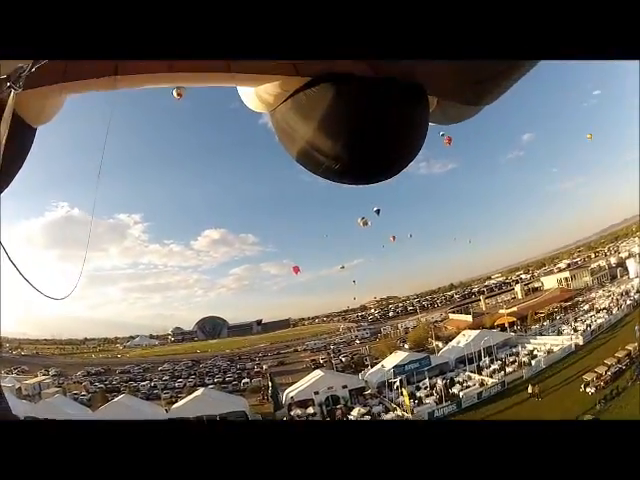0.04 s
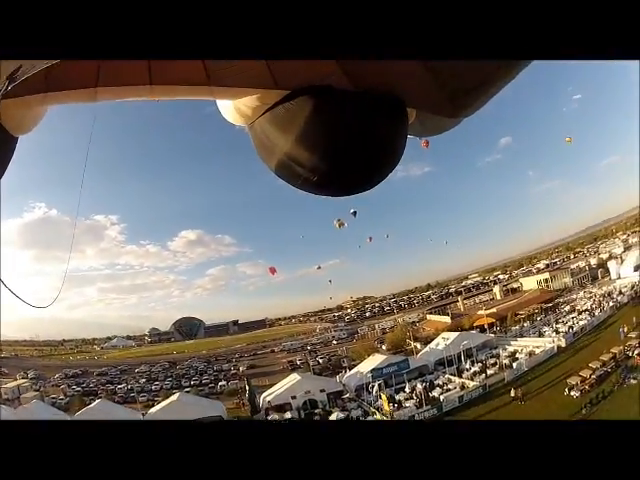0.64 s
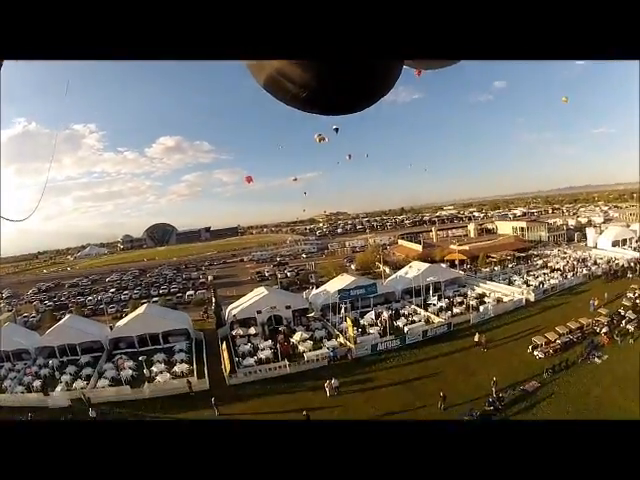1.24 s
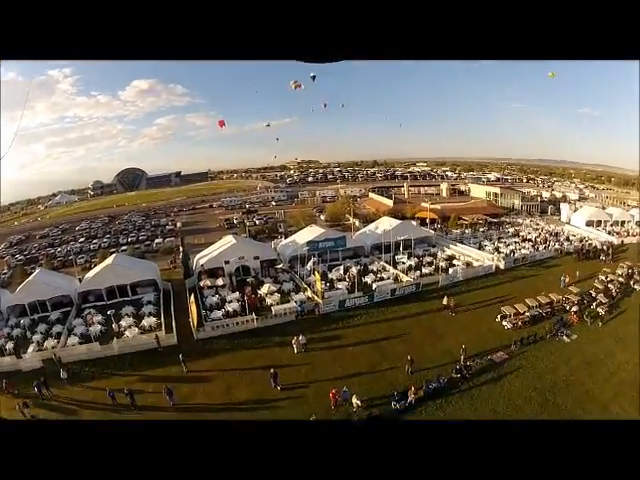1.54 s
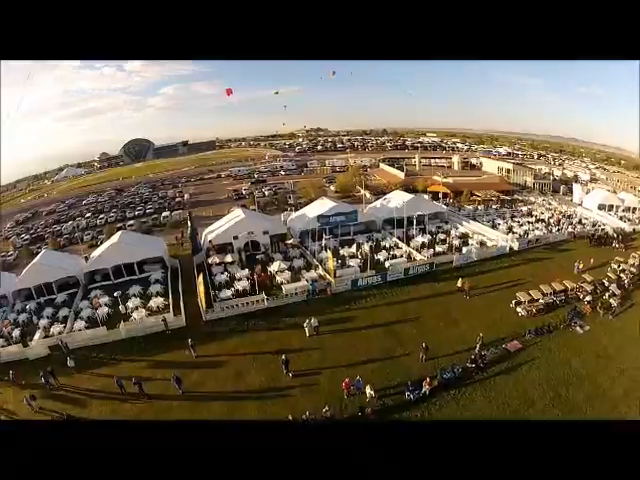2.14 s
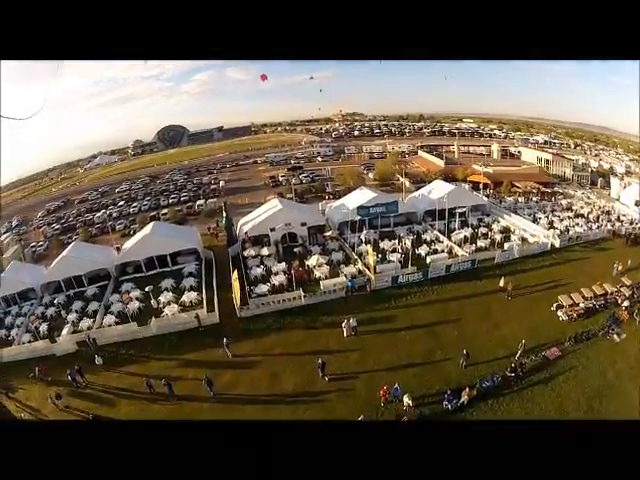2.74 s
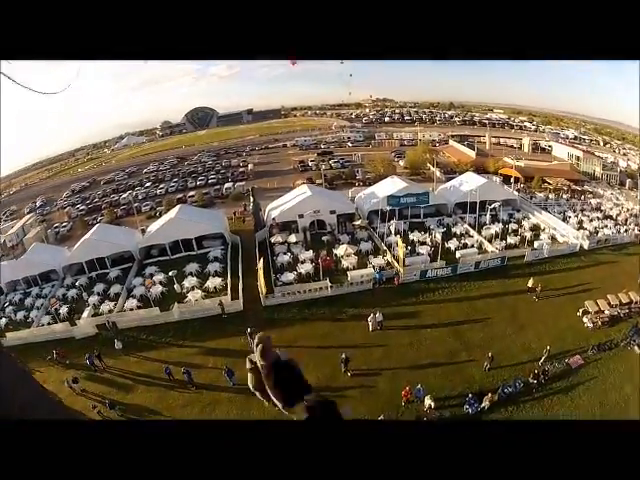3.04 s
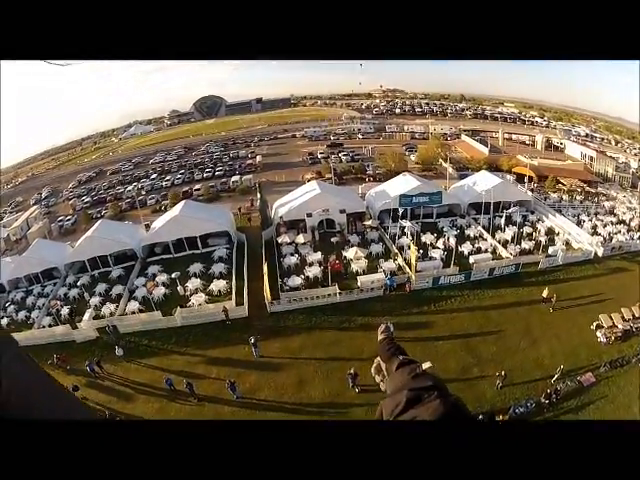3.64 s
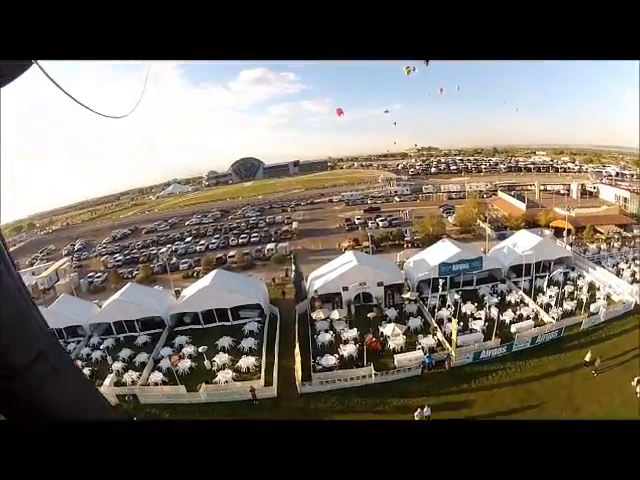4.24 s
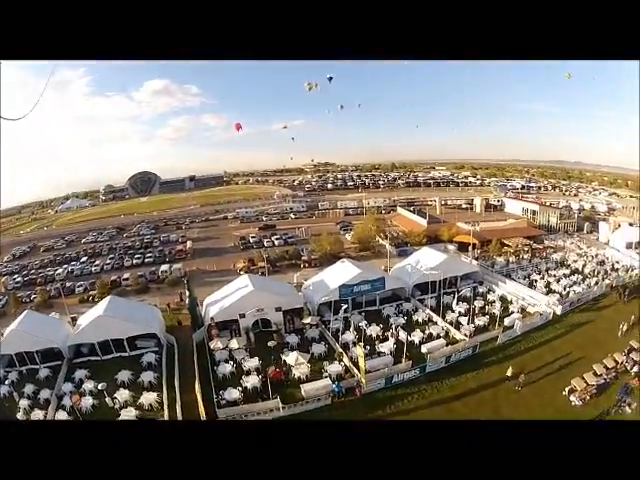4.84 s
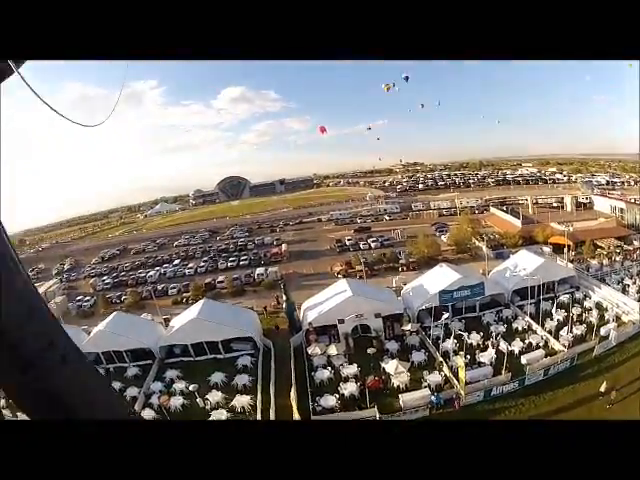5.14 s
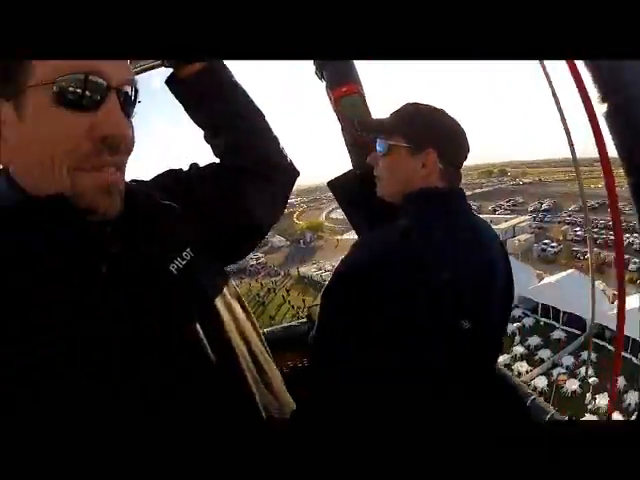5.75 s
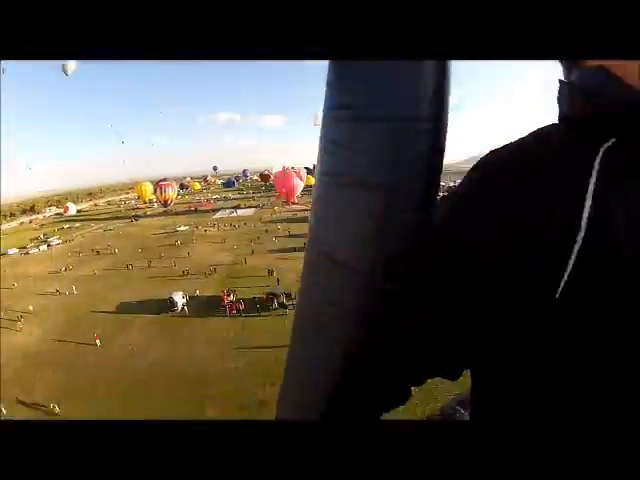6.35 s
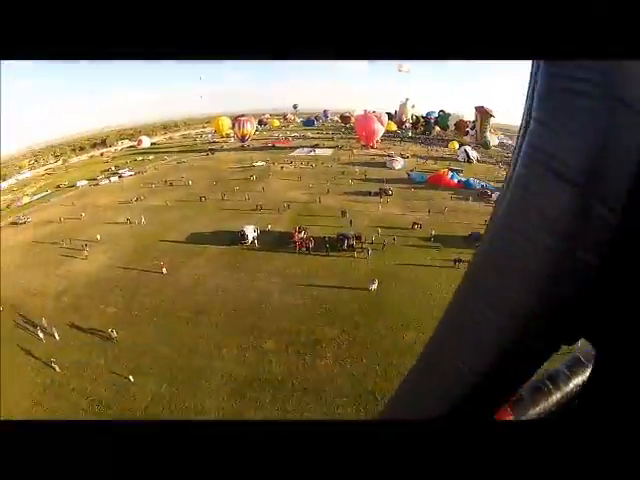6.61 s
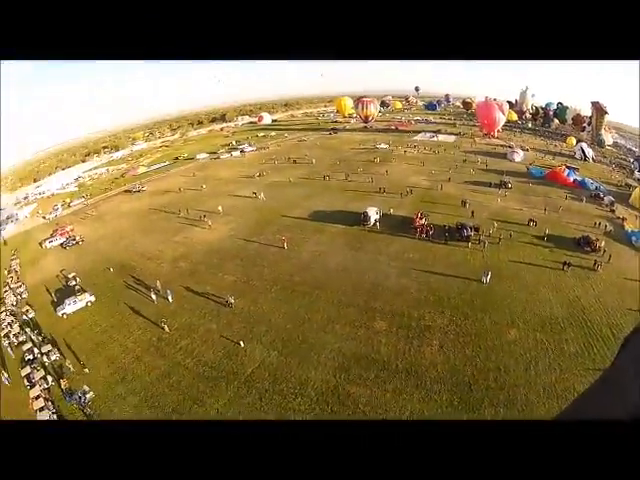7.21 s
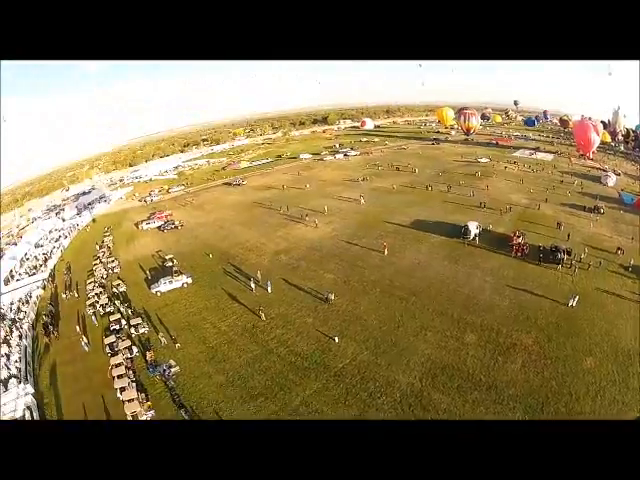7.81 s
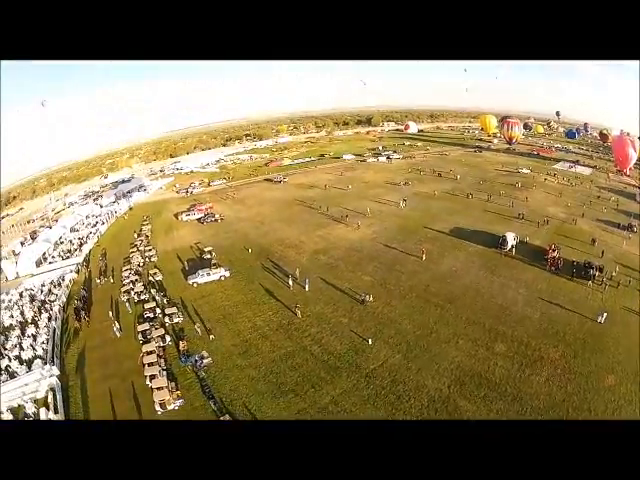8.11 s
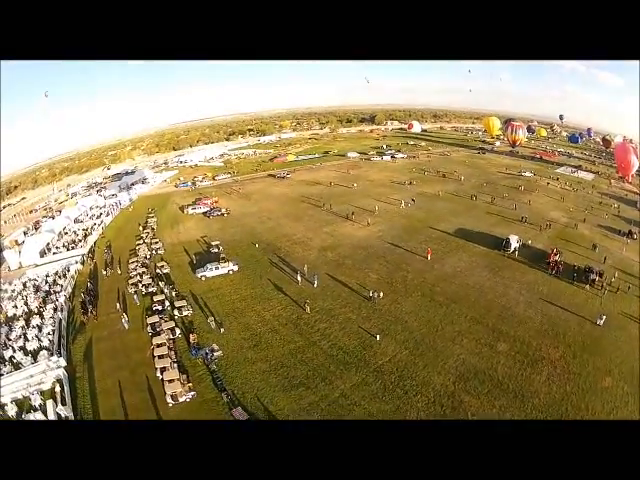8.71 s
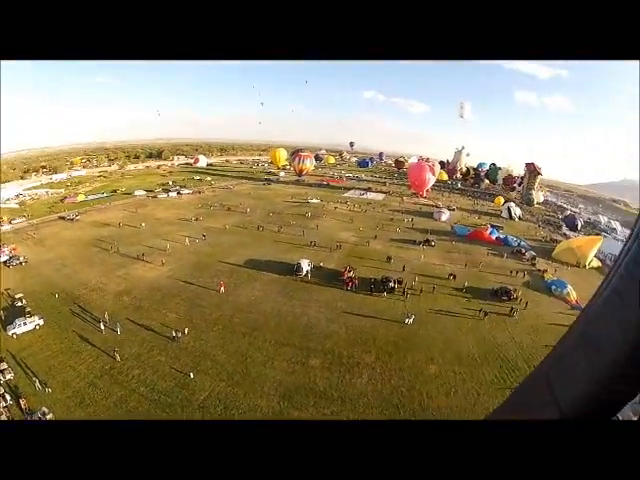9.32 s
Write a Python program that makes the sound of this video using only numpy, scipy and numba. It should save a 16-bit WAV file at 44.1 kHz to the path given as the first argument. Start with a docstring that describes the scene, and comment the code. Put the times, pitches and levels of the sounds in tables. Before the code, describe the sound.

Two long, loud blasts of a balloon burner, with hissing gas and small pops, split by a pause filled with faint distant rumbling.

```python
"""A hot-air balloon's propane burner fires two long blasts just above the basket. Its swirling flame
roars, pockets of gas pop as they catch fire, and the gas jets hiss. Between the blasts one hears other
burners rumbling far off, a faint whistle and a clink of metal; then the flame relights with a thump.
A small mono camera turns itself down after each peak and holds its samples at a low rate, which adds
a thin sizzle on top."""
import sys
import numpy as np
from scipy import signal
from scipy.fft import rfft, irfft
from scipy.io import wavfile
from scipy.ndimage import uniform_filter1d
from numba import njit

SR = 44100
rng = np.random.default_rng(int(sys.argv[2]) if len(sys.argv) > 2 else 0)


def wav_record(signal):
    """Record a signal, one row per channel, as 16-bit PCM in the file named by sys.argv[1]."""
    frames = np.transpose(np.atleast_2d(signal))
    bounded = np.clip(frames, -1, 1)
    # unit amplitude maps onto the largest positive 16-bit level
    quanta = np.round(bounded * 32767).astype(np.int16)
    wavfile.write(sys.argv[1], SR, quanta)


N = 417627
TIME = np.arange(N) / SR
SHUT_S, RELIGHT_S = 4.124, 5.6  # the valve is half shut; the valve opens again
IN_VIEW_DB, HIDDEN_DB = -33, -37.5  # jet levels in the treble tables: burner in plain view, burner hidden

# A spectrum says how strong the low and the high parts of a noise are.
# Other burners across the launch field: (frequency [Hz], level [dB])
FAR_BURNER_SPECTRUM = [(20, -12), (60, -3), (120, 1), (300, -4.5), (730, -8.5), (850, -16), (885, -14.5),
                       (950, -24), (2300, -27), (3050, -30.5), (3600, -40), (4450, -34.5), (4830, -32),
                       (5900, -48)]
# A faint whistle, perhaps the pilot light: (pitch [Hz], level [dB])
WHISTLE_TONE = [(872.1, -56.5)]
# Gas pockets catching fire; the deepest is the relighting thump:
# (time [s], push level [dB], pitch [Hz], crack level [dB])
GAS_POPS = [(0.286, 5, 440, -16), (0.794, -1, 260, -17), (0.911, 0, 230, -16), (1.995, 0, 250, -18),
            (2.326, 7, 420, -22), (2.573, 1, 220, -15), (2.727, 7, 460, -24), (3.483, 7.5, 470, -24),
            (5.622, 3, 76, -30), (6.309, 0, 150, -24), (6.622, 1, 170, -20), (6.831, 6, 380, -7),
            (7.31, 0, 200, -17)]
# The short crack heard with each pop: (frequency [Hz], level [dB])
CRACK_SPECTRUM = [(800, 6.5), (1250, -4), (1700, -10), (2600, -14), (4500, -25)]
# The burner's metal can, ringing with a fresh flame inside: (frequency [Hz], level [dB])
FLARE_SPECTRUM = [(440, -2.5), (535, -1), (620, -10), (800, -11), (1060, -21.5), (1300, -45)]
# The hiss of the nozzles: (frequency [Hz], level [dB])
NOZZLE_SPECTRUM = [(3000, -29), (3450, -7), (3850, 0), (4200, 2), (4500, 0.5), (4800, 2.5), (5100, -2.5),
                   (5500, -7.5), (5950, -11)]
# The rush of the jets in plain view, shaped by the can: (frequency [Hz], level [dB])
OPEN_JET_SPECTRUM = [(700, -4), (1100, -1), (1230, -9), (1500, -1), (1780, -3.5), (2130, 2.5), (2480, -2),
                     (2680, -6), (2960, 0), (3200, -3), (3450, -10.5), (4200, -33)]
# The hollower rush that comes around the frame and people: (frequency [Hz], level [dB])
HIDDEN_JET_SPECTRUM = [(700, -3.5), (1100, -2.5), (1290, -6.5), (1650, -2), (2200, 1.5), (2450, -4.5),
                       (2660, -8), (2950, -0.5), (3150, -5), (3330, -13.5), (4200, -38)]
# The treble (high sounds) of each blast, as frame and people shield the turning microphone:
# (time [s], relative jet level [dB], relative nozzle level [dB])
FIRST_BLAST_TREBLE = [(0.05, -40, -40.5), (1.62, -35, -42.5), (1.76, -34.5, -40.5), (2.54, -33, -41),
                      (3.57, -37.5, -42.5), (3.82, -38.5, -45.5)]
SECOND_BLAST_TREBLE = [(5.66, -42.5, -41), (5.93, -44.5, -41.5), (7.11, -31.5, -33.5), (7.63, -33, -33),
                       (9.06, -30, -30.5), (9.4, -34, -36)]
# The swirling body of the flame: (frequency [Hz], level [dB])
FLAME_BODY_SPECTRUM = [(20, -27), (45, -12.5), (120, -4), (175, -4), (215, 0), (255, -4.5), (290, -3),
                       (350, -20.5)]
# The root of the flame at the burner coils: (frequency [Hz], level [dB])
FLAME_ROOT_SPECTRUM = [(255, -20.5), (305, -0.5), (345, -2.5), (400, -1), (440, -3), (510, 1.5), (620, -4),
                       (780, -11), (980, -28.5), (1350, -53.5)]


def undb(db):
    """Turn decibels into a number to multiply a sound by."""
    return 10 ** (np.asarray(db) / 20)


def wander(per_s):
    """A smooth random curve, roughly between -1 and 1, that heads for a new value per_s times a second."""
    width = max(int(SR / per_s), 2)
    steps = np.repeat(rng.standard_normal(N // width + 1), width)
    return 1.3 * uniform_filter1d(uniform_filter1d(steps, width), width)[:N]


def colour(sound, spectrum):
    """Shape a sound with a spectrum, fade what lies beyond its ends, and scale to an average power of 1."""
    hz, db = np.transpose(spectrum)
    freqs = np.maximum(np.arange(N // 2 + 1) * SR / N, 1)
    shape = undb(np.interp(np.log(freqs), np.log(hz), db))
    edges = np.minimum(freqs / hz[0], 1) ** 2 * np.minimum(hz[-1] / freqs, 1) ** 8
    shaped = irfft(rfft(sound) * shape * edges, N)
    return shaped / np.sqrt(np.mean(shaped ** 2))


def turbulence(spectrum, swirl_db, swirls_per_s):
    """Flowing gas makes noise in small swirls, each with its own strength."""
    return colour(rng.standard_normal(N) * undb(swirl_db * wander(swirls_per_s)), spectrum)


@njit
def follow_peaks(sound, start, rise, fall):
    """Track a sound's peaks: jump up fast, sink back slowly."""
    peaks, level = np.empty(len(sound)), start
    for i in range(len(sound)):
        level += (sound[i] - level) * (rise if sound[i] > level else fall)
        peaks[i] = level
    return peaks


def far_burners(level_db, swell_db):
    """Distant burners blend into a dull, nearly steady rumble."""
    rumble = turbulence(FAR_BURNER_SPECTRUM, swirl_db=0.45, swirls_per_s=44)
    return rumble * undb(level_db + swell_db * wander(2.82))


def whistle(waver_hz):
    """A thin, constant tone whose pitch wavers a little."""
    hz, db = WHISTLE_TONE[0]
    pitch = hz + waver_hz * wander(12)
    return np.sqrt(2) * undb(db) * np.sin(2 * np.pi * np.cumsum(pitch) / SR)


def clink(at_s, level_db, hz, rise_s, fade_s):
    """Metal fittings scrape once, faintly."""
    age = np.maximum(TIME - at_s + rise_s, 0)
    ring = colour(rng.standard_normal(N), [(hz / 2, -9), (hz, 0), (hz * 1.2, -9)])
    return undb(level_db) * ring * np.minimum(age / rise_s, 1) * np.exp(-age / fade_s)


def pops(cycles, crack_s):
    """Each gas pocket catches all at once: it pushes the air and sucks it back; a short crack sounds with each
    pop."""
    push, crack_level = np.zeros(N), np.zeros(N)
    for at_s, push_db, hz, crack_db in GAS_POPS:
        near = np.abs(TIME - at_s) < .05
        age = TIME[near] - at_s
        push[near] -= undb(push_db) * np.sin(2 * np.pi * hz * age) * np.exp(-(hz * age / cycles) ** 2)
        crack_level[near] += undb(crack_db) * np.exp(-np.abs(age) / crack_s)
    return push + crack_level * colour(rng.standard_normal(N), CRACK_SPECTRUM)


def flare(level_db, build_s, settle_s):
    """After relighting, the can rings until the flame stands clear of it."""
    age = np.maximum(TIME - RELIGHT_S, 0)
    swell = (1 - np.exp(-age / build_s)) * np.exp(-age / settle_s)
    return undb(level_db) * swell * turbulence(FLARE_SPECTRUM, swirl_db=1.5, swirls_per_s=62)


def nozzle_hiss(nozzle_db, boost_db):
    """Gas leaving the nozzles makes a high, even hiss."""
    return undb(nozzle_db + boost_db) * turbulence(NOZZLE_SPECTRUM, swirl_db=0.23, swirls_per_s=220)


def gas_jets(jet_db, boost_db):
    """The more the rushing jets are hidden from the microphone, the fainter and hollower they sound."""
    hidden = np.clip((jet_db - IN_VIEW_DB) / (HIDDEN_DB - IN_VIEW_DB), 0, 1)
    direct = turbulence(OPEN_JET_SPECTRUM, swirl_db=1.0, swirls_per_s=780)
    hollow = colour(rng.standard_normal(N), HIDDEN_JET_SPECTRUM)
    return undb(jet_db + boost_db) * (np.sqrt(1 - hidden) * direct + np.sqrt(hidden) * hollow)


def flame_body(jet_db, level_db, relit_boost_db, build_s):
    """The flame's swirling body rumbles; once relit it burns harder, which takes a moment to build."""
    growth = 1 - np.exp(-np.maximum(TIME - RELIGHT_S, 0) / build_s)
    shielding_db = 0.16 * (jet_db - IN_VIEW_DB)  # low sound bends around obstacles, so it loses little
    billow_db = 0.2 * wander(4.4)
    rumble = turbulence(FLAME_BODY_SPECTRUM, swirl_db=1.5, swirls_per_s=70)
    return undb(level_db + relit_boost_db * growth + shielding_db + billow_db) * rumble


def flame_root(level_db, relit_boost_db):
    """The flame roars at the burner coils, a touch louder once relit."""
    roar = turbulence(FLAME_ROOT_SPECTRUM, swirl_db=1.55, swirls_per_s=140)
    return undb(level_db + relit_boost_db * (TIME > RELIGHT_S)) * roar


def valve_flow(close_s, open_s):
    """How much gas gets through, from 0 to 1: the valve eases shut and later snaps open."""
    closing = .5 - .5 * np.tanh((TIME - SHUT_S) / (2 * close_s))
    opening = np.clip((TIME - RELIGHT_S) / open_s, 0, 1)
    return np.maximum(closing, opening)


def burner(surge_db):
    """Flame, jets and nozzles surge together with the boiling propane that feeds them."""
    times, jet_levels, nozzle_levels = np.transpose([*FIRST_BLAST_TREBLE, *SECOND_BLAST_TREBLE])
    jet_db = np.interp(TIME, times, jet_levels)
    nozzle_db = np.interp(TIME, times, nozzle_levels)
    blast = flame_body(jet_db, level_db=-11.5, relit_boost_db=2.0, build_s=0.33)
    blast += flame_root(level_db=-11.5, relit_boost_db=0.3)
    blast += gas_jets(jet_db, boost_db=3.85)
    blast += nozzle_hiss(nozzle_db, boost_db=4.0)
    return blast * valve_flow(close_s=0.061, open_s=.007) * undb(surge_db * wander(40))


def scene():
    """All the sounds meet at one microphone."""
    air = far_burners(level_db=-30.5, swell_db=.7)
    air += whistle(waver_hz=2.87)
    air += clink(at_s=4.662, level_db=-45, hz=4400, rise_s=.006, fade_s=.02)
    air += pops(cycles=.7, crack_s=.0022)
    air += flare(level_db=-13, build_s=0.11, settle_s=1.0)
    air += burner(surge_db=0.6)
    return np.array([air, air])


def limiter(sound, threshold_db, sense_above_hz, duck_s, recover_s, smooth_s):
    """Turn the volume down after a peak; deep thumps are barely noticed, and any overshoot is cut off."""
    sensed = signal.sosfilt(signal.butter(1, sense_above_hz, "high", fs=SR, output="sos"), sound)
    threshold = float(undb(threshold_db))
    peaks = follow_peaks(np.abs(sensed), 1.4 * threshold, 1 / (duck_s * SR), 1 / (recover_s * SR))
    volume = uniform_filter1d(1 / np.maximum(peaks / threshold, 1), int(smooth_s * SR))
    return np.clip(sound * volume, -1, 1)


def hold_samples(sound, rate_hz):
    """Holding each slow sample like a stair step adds a faint, high mirror image of the sound: a sizzle."""
    slow = signal.resample_poly(sound, rate_hz, SR, window=("kaiser", 4))
    stairs = np.repeat(slow, 16)
    return signal.resample_poly(stairs, SR, 16 * rate_hz)[:N]


def record(dry):
    """The mono camera tames the peaks, holds its samples and cuts off the very highest sounds."""
    mono = dry.mean(axis=0)
    tamed = limiter(mono, threshold_db=-9.5, sense_above_hz=505,
                    duck_s=.0013, recover_s=.079, smooth_s=.0015)
    held = hold_samples(tamed, rate_hz=12000)
    top_cut = signal.ellip(10, .2, 70, 15350, fs=SR, output="sos")  # steep, above 15350 Hz
    out = signal.sosfilt(top_cut, held)
    return np.array([out, out])


dry = scene()
out = record(dry)
wav_record(out)
```